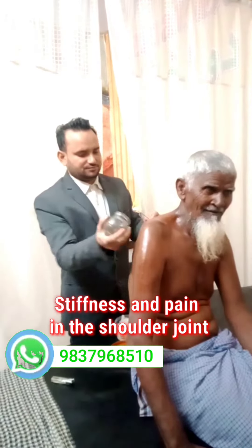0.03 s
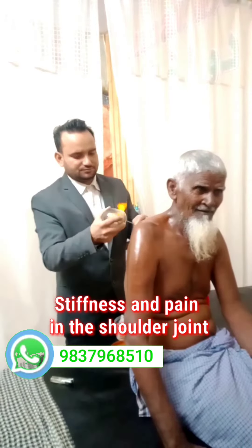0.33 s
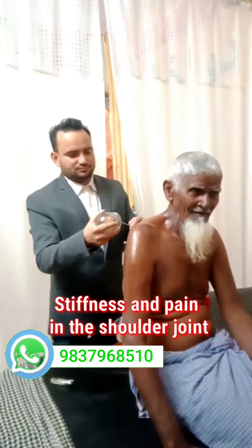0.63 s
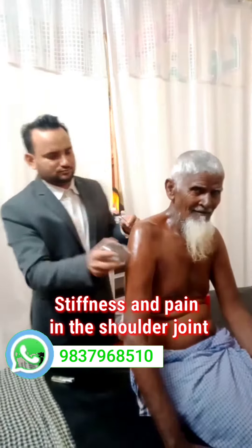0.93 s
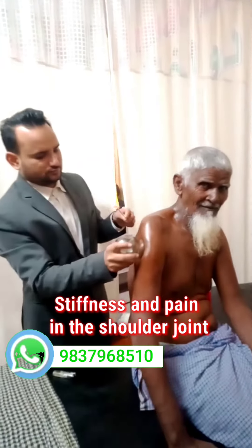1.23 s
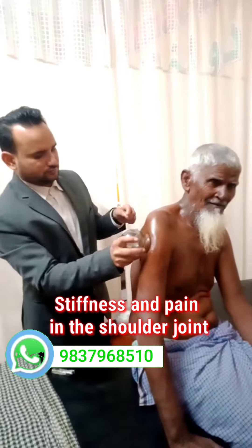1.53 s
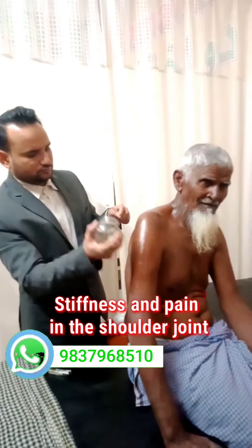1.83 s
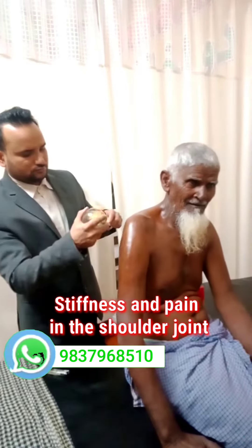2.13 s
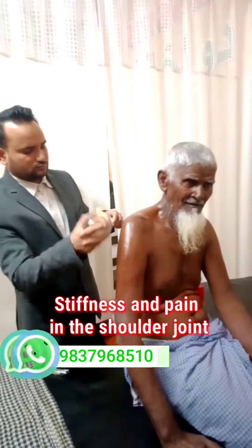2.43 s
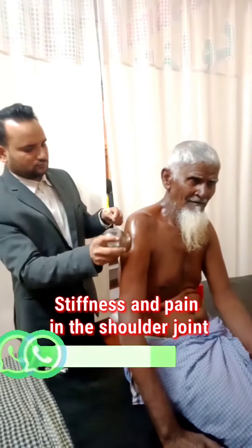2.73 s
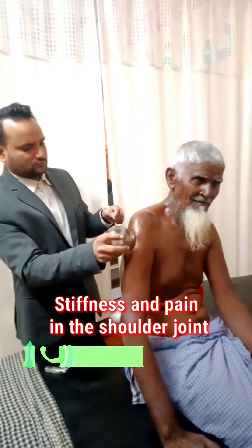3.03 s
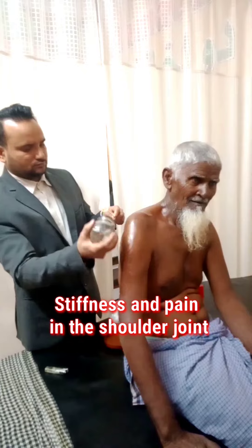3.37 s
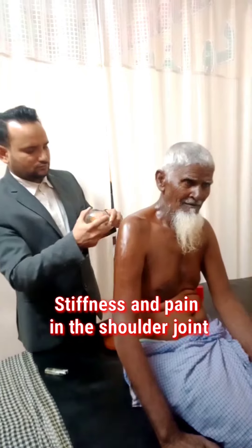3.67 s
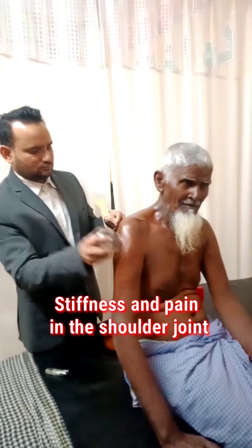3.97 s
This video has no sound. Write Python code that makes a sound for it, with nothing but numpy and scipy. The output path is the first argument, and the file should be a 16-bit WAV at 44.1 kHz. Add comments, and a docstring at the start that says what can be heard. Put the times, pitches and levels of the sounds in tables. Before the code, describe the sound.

Three short, wet pops of a cupping glass pulled off skin, with faint room noise.

```python
"""Cupping glass pulled off skin

A glass cup comes off oiled skin three times in a small, bare room. Air spits in under the rim,
the seal breaks with a wet smack, and the air in the cup rings, rising in pitch as the gap widens.
The room carries each pop on. Between them: soft handling, faint hiss and a low outdoor rumble."""
import sys
import numpy as np
from scipy import signal
from scipy.fft import rfft, irfft
from scipy.io import wavfile
from scipy.ndimage import uniform_filter1d

SR = 44100
rng = np.random.default_rng(int(sys.argv[2]) if len(sys.argv) > 2 else 0)


def unload_audio(sound):
    """Save the sound as a 16-bit wav file, at the path given as the first command line argument."""
    columns = np.transpose(np.atleast_2d(sound))
    # keep every value between -1 and 1, then stretch to whole-number steps
    steps = np.round(np.clip(columns, -1, 1) * 32767)
    wavfile.write(sys.argv[1], SR, steps.astype(np.int16))


N = 176400
T = np.arange(N) / SR
BIN_OCTAVES = np.log2(np.maximum(np.arange(N // 2 + 1) * SR / N, 1))


def from_db(db):
    """Decibels to gain."""
    return 10 ** (np.asarray(db) / 20)


def unit_rms(x):
    """Scale to rms 1."""
    return x / np.sqrt(np.mean(x ** 2))


def shaped_noise(spectrum):
    """Noise with a spectrum of (Hz, dB) points."""
    hz, db = np.array(spectrum, float).T
    gain = from_db(np.interp(BIN_OCTAVES, np.log2(hz), db))
    return unit_rms(irfft(rfft(rng.standard_normal(N)) * gain, N))


def band_noise(hz, octaves):
    """Noise in a bell around one frequency."""
    bell = np.exp(-.5 * ((BIN_OCTAVES - np.log2(hz)) / octaves) ** 2)
    return unit_rms(irfft(rfft(rng.standard_normal(N)) * bell, N))


def wander(rate_hz):
    """Smooth random motion, rms 1."""
    hold = max(int(SR / rate_hz), 1)
    steps = rng.standard_normal(N)[np.arange(N) // hold]
    return unit_rms(uniform_filter1d(steps, hold))


def gate(start, end, rise_s, release_s):
    """Linear rise, hold, exponential release."""
    return np.clip((T - start) / rise_s, 0, 1) * np.exp(-np.maximum(T - end, 0) / release_s)


def decay(t, t60):
    """Exponential fall of 60 dB in t60 seconds."""
    return np.exp(-np.log(1000) * t / t60)


# Each row: start in seconds, level in dB re POP_DB, open pitch in Hz, opening and ring times in seconds.
SEAL_BREAKS = [(0.0292, -11.5, 821, 0.019, 0.036), (1.7673, -13, 823, .0125, 0.026),
               (3.3030, -11.5, 839, 0.0127, 0.026)]
POP_DB, POP_ATTACK_S, RING_SHAPE = -6.5, 0.0011, 2.08
THUMP_HZ, THUMP_DECAY_S, THUMP_DB = 187, 0.0021, -4

def pops():
    """The cup's air resonance glides up as the rim lifts; the skin springs back with a thump."""
    out = np.zeros(N)
    for start, db, open_hz, opening_s, ring_s in SEAL_BREAKS:
        t = np.maximum(T - start, 0)
        hz = open_hz * np.sqrt(1 - np.exp(-t / opening_s))
        tone = np.sin(2 * np.pi * np.cumsum(hz) / SR) * np.exp(-(t / ring_s) ** RING_SHAPE)
        thump = from_db(THUMP_DB) * np.sin(2 * np.pi * THUMP_HZ * t) * np.exp(-t / THUMP_DECAY_S)
        attack = 1 - np.exp(-t / POP_ATTACK_S)
        out -= from_db(db + POP_DB) * (tone + thump) * attack
    return out


# Each row: start, end and rise in seconds, level in dB, whistle in Hz, relative whistle level in dB.
RIM_LEAKS = [(0.019, .029, 0.0016, -33, 1080, 3.5), (1.7554, 1.764, 0.0015, -37, 1304, -1),
             (3.2815, 3.304, 0.014, -32, 1306, -7.5)]
# Each row: frequency in Hz, relative level in dB.
LEAK_SPECTRUM = [(300, -17), (800, -6), (1150, -2), (1500, -1), (1680, -5), (1950, -1), (2300, -6),
                 (3700, -14), (4100, -23), (6000, -25), (7300, -43), (10500, -47), (11600, -39),
                 (15500, -50)]

def leaks():
    """A short, uneven spit of air whistles at the rim just ahead of each pop."""
    out = np.zeros(N)
    for start, end, rise_s, db, whistle_hz, whistle_db in RIM_LEAKS:
        air = shaped_noise(LEAK_SPECTRUM) + from_db(whistle_db) * band_noise(whistle_hz, octaves=0.081)
        roughness = np.exp(.25 * wander(rate_hz=900))
        out += from_db(db) * air * roughness * gate(start, end, rise_s, release_s=0.0013)
    return out


# Each row: start and length in seconds, level in dB, centre in Hz, width in octaves.
RUSTLES = [(1.032, 0.038, -61.5, 448.6, 0.33), (1.035, 0.035, -63, 200, .55),
           (2.157, 0.011, -55.5, 1100, 0.16), (2.16, 0.014, -66.5, 3314, 0.31),
           (2.603, 0.027, -61.5, 387.6, 0.56), (2.683, .35, -78, 271, 0.2), (3.763, 0.029, -67.5, 800, .35)]

def handling():
    """Soft puffs and rustles as the cup is warmed and set back on the skin."""
    out = np.zeros(N)
    for start, length, db, hz, octaves in RUSTLES:
        envelope = gate(start, start + length, rise_s=0.017, release_s=0.0076)
        out += from_db(db) * band_noise(hz, octaves) * envelope
    return out


# Each row: delay in seconds, gain.
WALL_ECHOES = [(.0027, 0.2), (.0145, 0.74), (.0185, 0.49), (.0405, 0.59), (.055, 0.25), (.060, 0.36)]
# Each row: band centre in Hz, level in dB re TAIL_DB, T60 in seconds.
TAIL_BANDS = [(62.23, -8.5, 1), (120.4, 0.5, 1.0), (248.4, -4.5, .85), (395, -4, 0.81), (454.7, 3, 0.64),
              (766, 2, 0.69), (1049, -3, 0.68), (1930, -2.5, 0.58), (4040, -4, 0.32), (12000, -7.5, 0.15)]
# Each row: frequency in Hz, level in dB, T60 in seconds.
STANDING_WAVES = [(105, -53, 1.5), (123.5, -51, .9), (254, -56, .7), (264, -57, .75), (423, -60, .65),
                  (498, -52, .6), (526, -53, .55), (594, -55, .6), (631, -49, .5), (663, -53, .5),
                  (712, -54, .5), (748, -55, .55), (791, -51, .6)]
TAIL_DB, TAIL_BUILD_S = 3, 0.023

def room():
    """Impulse response: diffuse tail, standing waves, direct sound and near walls."""
    t = T[:N // 2]
    centres_hz, levels_db, t60s = np.array(TAIL_BANDS, float).T
    spectrum = rfft(rng.standard_normal(N))
    out = np.zeros(len(t))
    for share, db, t60 in zip(np.eye(len(centres_hz)), levels_db, t60s):
        band = irfft(spectrum * np.interp(BIN_OCTAVES, np.log2(centres_hz), share), N)[:len(t)]
        envelope = (1 - np.exp(-t / TAIL_BUILD_S)) * decay(t, t60)
        out += from_db(db + TAIL_DB) * band * envelope / np.linalg.norm(envelope)
    for hz, db, t60 in STANDING_WAVES:
        out += from_db(db) * np.cos(2 * np.pi * hz * t) * decay(t, t60)
    out[0] += 1  # direct sound
    for delay_s, gain in WALL_ECHOES:
        out[int(delay_s * SR)] += gain
    return out


# Each row: frequency in Hz, relative level in dB.
HISS_SPECTRUM = [(180, -77.5), (300, -33), (396, -6), (726, -22), (1040, -4.5), (1350, -1), (2040, -2),
                 (3070, -7.5), (3440, -10.5), (7670, -41.5), (15000, -41.5)]
# Each row: time in seconds, level in dB.
HISS_ENVELOPE = [(0, -64), (.28, -67.5), (.42, -63), (.8, -64.5), (1.1, -61.5), (1.35, -66), (1.55, -75),
                 (2.0, -70.5), (2.2, -68.5), (2.4, -72.5), (2.65, -70.5), (3.1, -76), (4, -69.5)]
HISS_FLICKER_DB = 2

def hiss():
    """Faint hiss whose quarter-octave bands flicker independently."""
    centres_hz = 400 * 2 ** np.arange(0, 4, .25)
    spectrum = rfft(shaped_noise(HISS_SPECTRUM))
    out = np.zeros(N)
    for share in np.eye(len(centres_hz)):
        band = irfft(spectrum * np.interp(BIN_OCTAVES, np.log2(centres_hz), share), N)
        out += band * from_db(HISS_FLICKER_DB * wander(rate_hz=10))
    return unit_rms(out) * from_db(np.interp(T, *np.array(HISS_ENVELOPE).T))


# Each row: frequency in Hz, relative level in dB.
RUMBLE_SPECTRUM = [(20, -26.5), (45, -23), (70, -1.5), (100, -1), (160, 0), (210, -5.5), (300, -21.5),
                   (500, -34), (900, -40), (3000, -80.5)]
# Each row: time in seconds, level in dB.
RUMBLE_ENVELOPE = [(0, -67), (.95, -70.5), (1.2, -72.5), (1.55, -64), (1.7, -65.5), (2.3, -64), (2.55, -65),
                   (2.9, -60), (3.2, -67.5), (4, -64)]
RUMBLE_FLICKER_DB = 2.83

def rumble():
    """Low outdoor noise with a slowly wavering level."""
    db = np.interp(T, *np.array(RUMBLE_ENVELOPE).T)
    return shaped_noise(RUMBLE_SPECTRUM) * from_db(db - RUMBLE_FLICKER_DB * wander(rate_hz=3.3))


# Each row: start and length in seconds, pitch in Hz, level in dB.
DISTANT_DRONES = [(2.76, .38, 160, -56), (2.56, .4, 688, -73), (3.87, .25, 165, -57), (3.88, .22, 204, -61)]
DRONE_FLICKER_DB, DRONE_PITCH_SPREAD = 1.9, 0.00554

def drones():
    """Faint distant tones swell and fade, unsteady in level and pitch."""
    out = np.zeros(N)
    for start, length, centre_hz, db in DISTANT_DRONES:
        swell = np.sin(np.pi * np.clip((T - start) / length, 0, 1))
        flicker = from_db(DRONE_FLICKER_DB * wander(rate_hz=41))
        hz = centre_hz * (1 + DRONE_PITCH_SPREAD * wander(rate_hz=30))
        out += from_db(db) * swell * flicker * np.sin(2 * np.pi * np.cumsum(hz) / SR)
    return out


BASS_CUT_HZ = 82.7

def scene():
    """The cup, too small to radiate deep bass, sounds in the room over the background."""
    highpass = signal.butter(5, BASS_CUT_HZ, "high", fs=SR, output="sos")
    cup = signal.sosfilt(highpass, pops() + leaks() + handling())
    cup_in_room = signal.fftconvolve(room(), cup)[:N]
    return (cup_in_room + hiss() + rumble() + drones())[None]


MIC_NOISE_DB, TREBLE_CUT_HZ = -95, 15500

def record(dry):
    """The microphone adds a trace of noise; the top treble is cut."""
    noisy = dry + from_db(MIC_NOISE_DB) * rng.standard_normal(N)
    lowpass = signal.ellip(8, .2, 70, TREBLE_CUT_HZ, fs=SR, output="sos")
    return signal.sosfilt(lowpass, noisy)


dry = scene()
out = record(dry)
unload_audio(out)
```